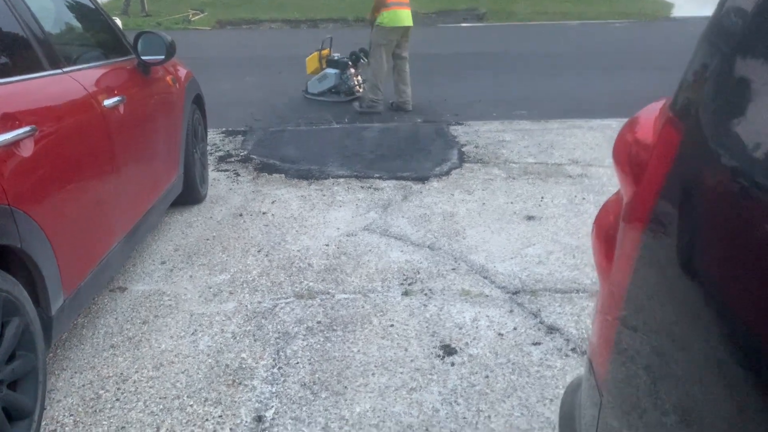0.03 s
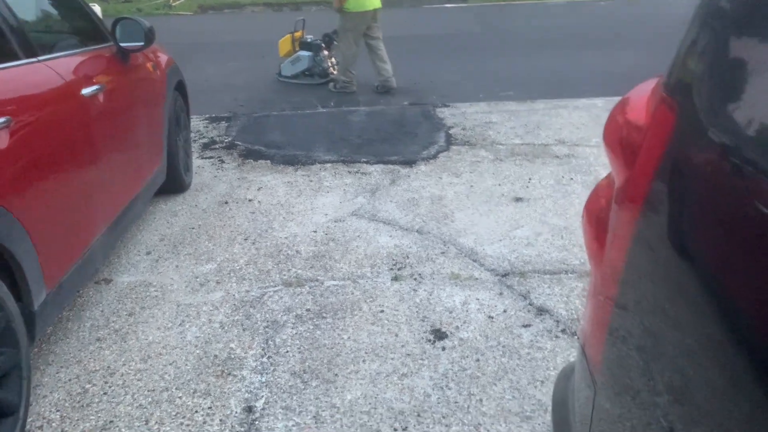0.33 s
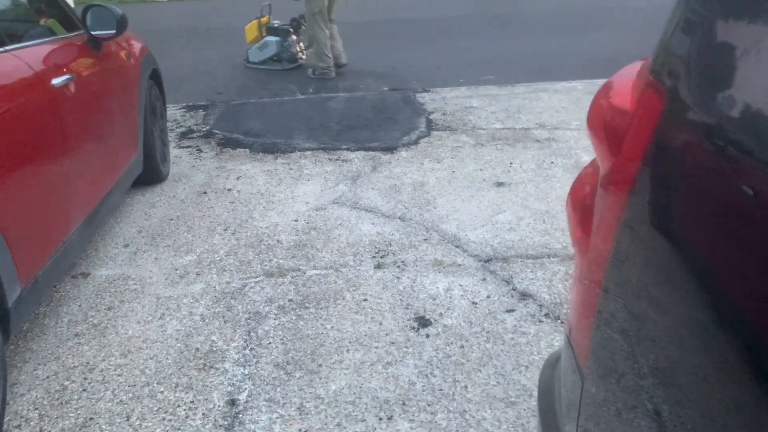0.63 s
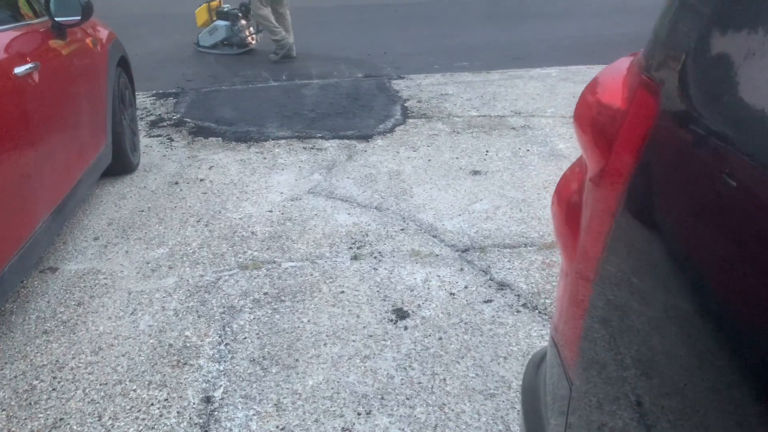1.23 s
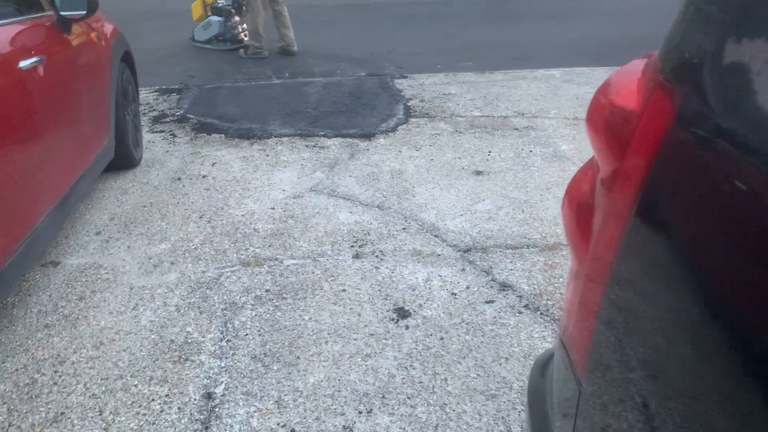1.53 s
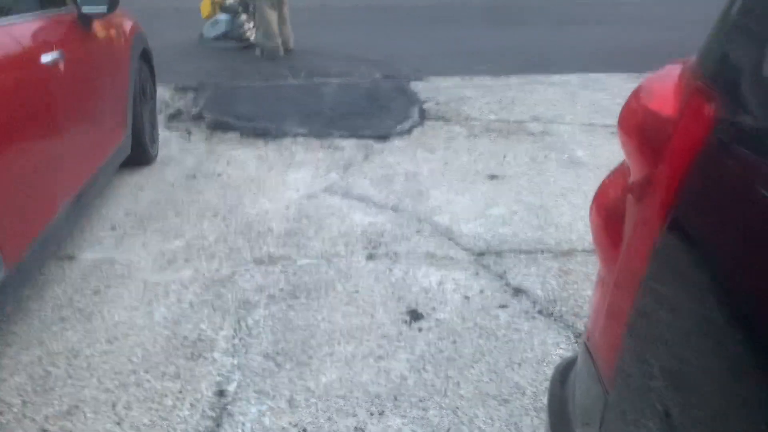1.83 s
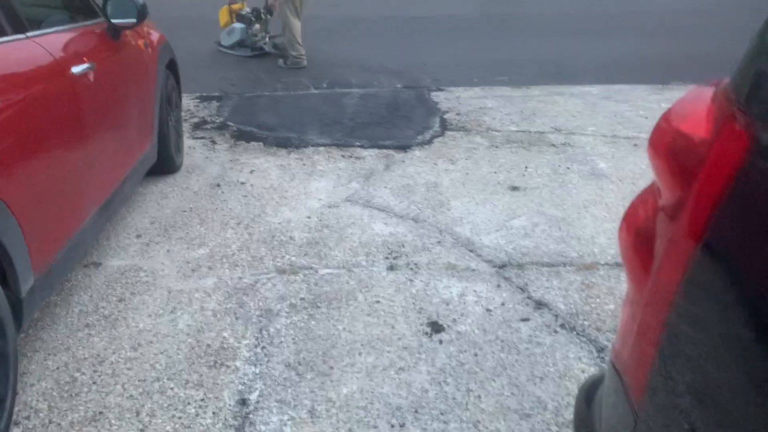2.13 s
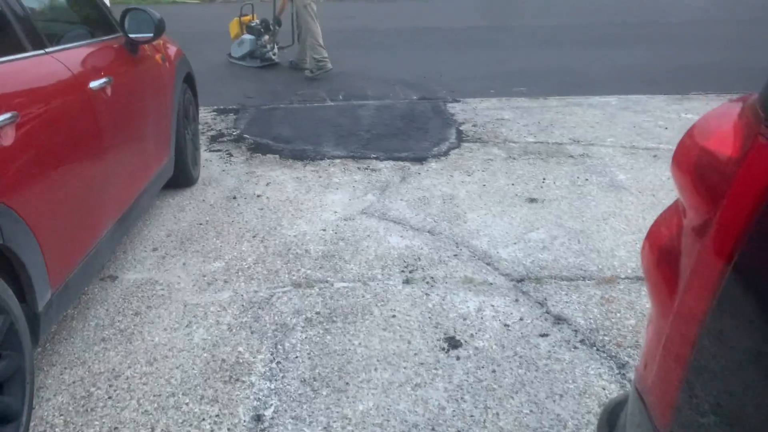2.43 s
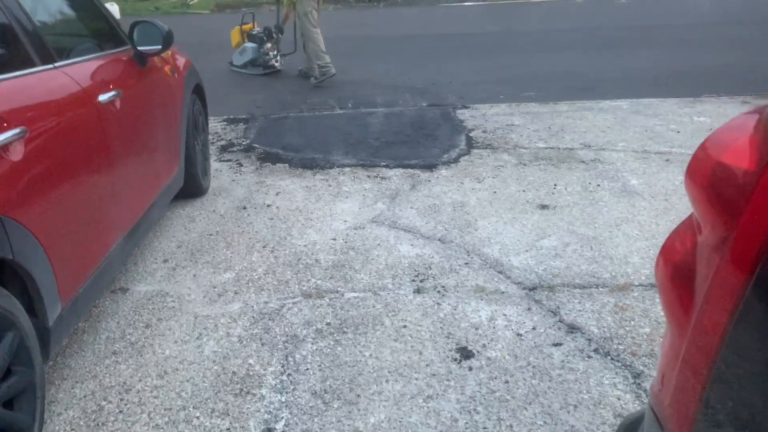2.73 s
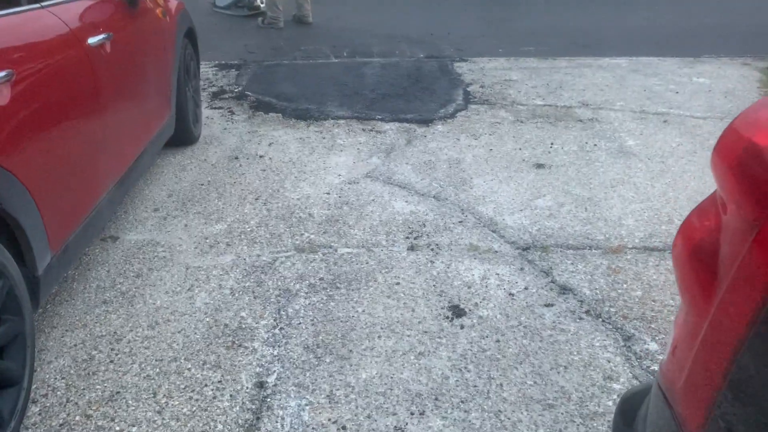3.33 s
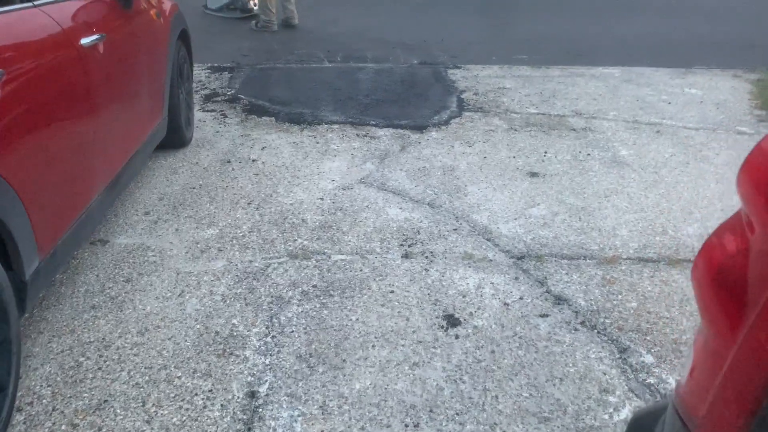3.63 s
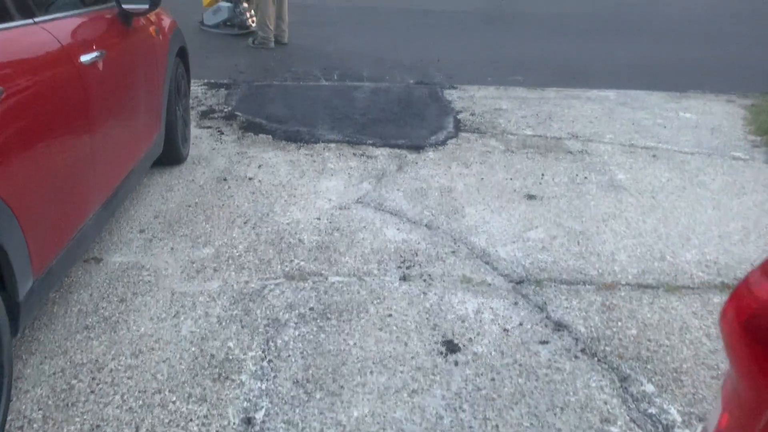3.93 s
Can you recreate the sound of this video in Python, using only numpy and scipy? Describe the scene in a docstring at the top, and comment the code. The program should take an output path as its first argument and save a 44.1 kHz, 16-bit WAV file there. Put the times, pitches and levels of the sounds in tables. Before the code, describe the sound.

Outdoors, a few metres down a driveway, a plate compactor rattles with fast, uneven metallic clanks above its petrol engine. After a brief ringing squeal it throttles down and the hammering dies away, leaving a few small close clicks.

```python
"""A petrol plate compactor works on fresh asphalt a few metres down a driveway, between two parked cars.
Its steel plate hammers the ground in ragged clanks and briefly sings; the engine putters and hisses underneath.
Then the throttle closes, the clanks thin out and stop, and a few small clicks sound near the microphone."""
import sys
import numpy as np
from scipy import signal
from scipy.fft import rfft, irfft
from scipy.io import wavfile

SR = 44100
rng = np.random.default_rng(int(sys.argv[2]) if len(sys.argv) > 2 else 0)


def master_out(mix):
    """Clip the mix to full scale and print it as 16-bit PCM to the path in sys.argv[1]."""
    frames = np.transpose(np.atleast_2d(mix))
    ceiling = np.clip(frames, -1, 1)
    pcm = np.round(ceiling * 32767).astype(np.int16)
    wavfile.write(sys.argv[1], SR, pcm)


N = 176400

# bouts of the plate striking the ground (s, level of the low ring dB, level of the bright crash dB)
CLANKS = [(0.0, -17.5, -26.5), (0.056, -18.5, -18), (0.112, -18, -20), (0.127, -31, -20), (0.145, -17.5, -18.5), (0.213, -19.5, -23),
          (0.289, -16, -14), (0.3, -24, -13.5), (0.398, -35, -28), (0.461, -20, -16.5), (0.488, -21.5, -20.5),
          (0.57, -20.5, -20), (0.645, -19.5, -18.5), (0.675, -24, -21), (0.727, -20.5, -19.5), (0.779, -37, -21.5),
          (0.823, -20.5, -21.5), (0.891, -18, -18), (0.916, -22, -20.5), (0.986, -25.5, -20.5),
          (1.028, -19, -21.5), (1.049, -18.5, -20), (1.073, -21.5, -29), (1.111, -20.5, -20), (1.211, -17, -22),
          (1.289, -17, -20), (1.304, -16.5, -16.5), (1.416, -22, -24), (1.446, -22.5, -23.5), (1.486, -23.5, -21), (1.545, -19.5, -24),
          (1.592, -19, -21.5), (1.669, -19, -23), (1.69, -16.5, -21), (1.778, -28.5, -23.5),
          (1.801, -23.5, -21.5), (1.85, -20.5, -26.5), (1.923, -19.5, -24.5), (1.964, -20, -24), (2.029, -18, -27.5),
          (2.078, -19, -31), (2.123, -19.5, -24), (2.173, -16.5, -19.5), (2.272, -14, -19), (2.287, -31, -24.5), (2.363, -15, -20),
          (2.426, -18.5, -21), (2.447, -20, -22.5), (2.477, -21, -18.5), (2.506, -20, -25.5), (2.54, -14, -25),
          (2.642, -21, -23.5), (2.657, -17, -20), (2.718, -32, -20.5), (2.798, -21.5, -29.5), (2.855, -19, -21),
          (2.931, -22, -23.5), (2.962, -22.5, -22.5), (3.105, -29, -29.5), (3.172, -24, -24), (3.192, -23.5, -20.5),
          (3.316, -39, -28.5), (3.356, -30, -27.5), (3.529, -39, -42)]
RING_DB, CRASH_DB, SPLIT_HZ = -1, -0.5, 1276
# plate modes (Hz, width Hz, lift as it first faces dB, lift once it has turned dB)
MODES_OF_PLATE = [(677.2, 19.3, 17.5, 16), (771.5, 22.5, 16, 22), (909.4, 24.5, -0.5, 16.5), (962, 10, -7, 14), (1090, 63, 12.5, 3.5),
                  (1368, 30, 7.5, 9.5), (1567, 64, 16, 12.5), (1607.6, 16.7, 17, 16), (2173, 112, 10.5, 14.5),
                  (2400, 64, 8.5, 12.5), (3593, 28, 10, -28), (4410, 30, 8.5, 1)]
TURN_S = (0.99, 2.27)  # the machine swings round between these times
STEEL = [(40, -59), (150, -11.5), (300, 0.5), (440, -8), (540, -2.5), (850, 0.5), (1250, -3), (1900, -12), (2700, -8), (3500, -13.5), (4600, -16.5), (6200, -25.5), (15000, -34.5)]  # (Hz, dB)
# steady chatter of the plate between clanks (s, dB)
CHATTER = [(0, -21.5), (.35, -24), (.55, -25), (1.5, -25), (2.2, -25.5), (2.47, -25.5), (2.75, -23.5), (3.05, -30.5), (3.33, -33), (3.62, -55.5), (4, -66)]
# the plate sings as it drags (s, length s, dB)
SQUEALS = [(2.277, 0.079, -13.5), (2.531, 0.0089, -7.5)]
SQUEAL_HZ, SQUEAL_RISE_S, SQUEAL_FALL_S, SQUEAL_WAVER = 766, 0.025, 0.036, 0.0095
# engine (s, exhaust dB, hiss dB)
ENGINE = [(0, -36.5, -33.5), (1.5, -36.5, -33), (2.5, -39.5, -33), (2.62, -42, -40), (3.05, -43, -41.5), (3.67, -46, -43.5), (3.72, -35, -46), (4, -54, -54)]
PLATE_RATIO = 3.25  # fixed
EXHAUST = [(20, -33), (60, -6.5), (95, -2.5), (152, 3.5), (212, 7), (300, -2.5), (420, -13.5), (900, -31), (3000, -59)]  # (Hz, dB)
FIRING_SPREAD_DB, PUFF_S, PUFF_SHARE = 1.5, 0.0081, 0.025
HISS = [(300, -9), (1500, 6), (3800, 2.5), (7500, 0.5), (11000, 0), (13000, -10), (16000, 7)]  # (Hz, dB)
HISS_PULSE, HISS_DECAY = 0.42, 1
# hum of the eccentric shaft (s, dB)
HUM = [(0, -38.5), (1, -41.5), (1.8, -38.5), (2.55, -36.5), (2.8, -49.5), (3.5, -55)]
# rumble of frame and ground (s, dB)
RUMBLE_LEVEL = [(0, -25.5), (1.4, -35.5), (1.85, -32.5), (2.5, -34.5), (2.75, -42.5), (3.3, -36), (3.6, -51.5)]
RUMBLE = [(20, -18), (45, -5.5), (85, -8.5), (160, -4.5), (290, -2.5), (450, -9.5), (700, -3), (1200, -21), (4000, -50)]  # (Hz, dB)
AIR, AIR_DB = [(20, -26), (60, 18.5), (190, 17), (400, -19.5), (2000, 1.5), (3000, -3.5), (6000, -43)], -45.5  # (Hz, dB)
# small sharp clicks (s, dB)
CLICKS = [(1.008, -26), (2.099, -42), (3.708, -35), (3.736, -31), (3.767, -35)]
CLICK_S = .005  # fixed
CLICK = [(500, -17), (3000, -45), (3850, 11), (4700, -27), (5700, 3), (7300, 1.5), (9000, -3), (10500, -3), (13000, -14), (15500, -3)]  # (Hz, dB)
ECHO_DB, ECHO_T60_S, ECHO_DELAY_S = -12.5, 0.28, .005
# the two microphone ports (Hz, radians by which left leads)
PORT_PHASE = [(0, 10.5), (110, -0.9), (310, 3), (430, 7.5), (780, 7.5), (1450, 8.5), (1620, 8), (1950, 9.5),
              (2170, 9), (2750, 10), (3900, 13), (4300, 13), (5350, 23.5), (6050, 27), (7000, 25.5), (11000, 18), (15300, 16.5)]
# (Hz, left minus right dB)
PORT_BALANCE = [(460, 0), (590, -8), (820, -3.5), (930, 3.5), (1350, -3.5), (1550, 4.5), (1850, -23.5), (2150, 5), (2400, -7), (4300, 0), (4700, -9), (5900, -12), (6400, 0)]
CUT_HZ = 15900  # fixed
T = np.arange(N) / SR
# the frame booms at one low resonance (s, dB)
BOOM_LEVEL = [(0, -26), (.31, -29.5), (.5, -42.5), (2.5, -38), (3.05, -60), (3.22, -36), (3.38, -34), (3.55, -45.5)]
BOOM_HZ, BOOM_WIDTH_HZ = 275, 69
BOOM_PHASE = 1.78  # radians by which left leads
# engine speed (s, firings per s)
FIRING = [(0, 30.3), (2.57, 30.25), (2.9, 24), (3.1, 21.5), (3.6, 17), (4, 14.5)]  # fixed
DRIFT_S, DRIFT_TOP_HZ = 5.5e-5, 4460  # as the machine moves, the left port's lead shrinks by this much, below this frequency
RING_ATTACK_S, RING_HOLD_S, RING_RELEASE_S = 0.0046, 0.013, .013
CRASH_HOLD_S, CRASH_RELEASE_S = .007, .009  # fixed
ATTACK_S = None
HOLD_S = None
RELEASE_S = None
STRIKE_SHARE = None
GRIND = None
GRIT_DB, CHATTER_BRIGHT_DB = 2.5, 0  # unevenness of the grinding; its treble is as bright as a clank's
MODE_SPREAD_DB, MODE_DETUNE = 2.5, 0.004  # each blow lands on another spot and favours other modes
# a thin metallic ring on the first clanks (s, dB relative to the plate)
THIN_RING = [(0, 6), (.32, 7), (.45, -32)]
THIN_RING_HZ, THIN_RING_WIDTH_HZ = 2418, 60  # fixed
# brief high squeaks (s, pitch Hz, dB)
SQUEAKS = [(.58, 9340, -35.5), (.794, 9400, -35), (0.994, 9500, -49), (1.12, 7530, -35), (1.234, 7900, -38), (3.645, 7540, -41), (3.675, 7570, -52)]
SQUEAK_S = 0.022


def amp(db):
    """Decibels to gain."""
    return 10 ** (np.asarray(db) / 20)


def unit(x):
    """Scales to an rms of one."""
    return x / np.sqrt(np.mean(x ** 2) + 1e-20)


def curve(points, column=1):
    """A control over time."""
    points = np.array(points)
    return np.interp(T, points[:, 0], points[:, column])


def read(points, hz):
    """A value over log frequency."""
    f, value = np.transpose(points)
    return np.interp(np.log(hz + 1), np.log(f + 1), value)


def add(mix, s, sound):
    """Lays a sound into the mix at a time."""
    part = mix[max(round(s * SR), 0):][:len(sound)]
    part += sound[:len(part)]


def response(gain_at, size=16384):
    """Causal impulse response of a gain over frequency."""
    log_gain = np.log(np.maximum(gain_at(abs(np.fft.fftfreq(size, 1 / SR))), 1e-5))  # fixed
    return np.fft.ifft(np.exp(np.conj(signal.hilbert(log_gain)))).real[:size // 2]


def colour(x, points):
    """Gives a sound a spectrum."""
    return signal.fftconvolve(x, response(lambda hz: amp(read(points, hz))))[:len(x)]


def wander(rate_hz):
    """Slow chance of rms one."""
    return unit(irfft(rfft(rng.standard_normal(N)) * np.exp(-(np.fft.rfftfreq(N, 1 / SR) / rate_hz) ** 2), N))


def plate_gain(hz, turned, luck=np.zeros((len(MODES_OF_PLATE), 2))):
    """The plate's modes standing out of its broad steel colour; luck shifts each mode's strength and pitch."""
    lift = sum(((1 - turned) * amp(first) ** 2 + turned * amp(later) ** 2) * amp(MODE_SPREAD_DB * louder) ** 2
               / (1 + (2 * (hz - f * (1 + MODE_DETUNE * higher)) / width) ** 2)
               for (f, width, first, later), (louder, higher) in zip(MODES_OF_PLATE, luck))
    return amp(read(STEEL, hz)) * np.sqrt(1 + lift)


def plate():
    """Grit rings the plate: steady chatter, and clanks whenever it bounces hard."""
    swing = np.interp(T, TURN_S, (0, 1))
    grit = rng.standard_normal(N) * amp(GRIT_DB * wander(150))  # fixed
    soft = lambda hz: amp(CHATTER_BRIGHT_DB * (1 - low_share(hz)))
    first, later = (unit(signal.fftconvolve(grit, response(lambda hz: plate_gain(hz, k) * soft(hz)))[:N]) for k in (0, 1))
    out = amp(curve(CHATTER)) * ((1 - swing) * first + swing * later)
    for s, ring_db, crash_db in CLANKS:
        add(out, s, clank(s, ring_db, crash_db))
    thin = signal.lfilter(*signal.iirpeak(THIN_RING_HZ, THIN_RING_HZ / THIN_RING_WIDTH_HZ, SR), out)
    return out + amp(curve(THIN_RING)) * thin


def squeals():
    """Dragging holds the strongest mode in a nearly pure tone."""
    out = np.zeros(N)
    tone = np.sqrt(2) * np.sin(2 * np.pi * np.cumsum(SQUEAL_HZ * (1 + SQUEAL_WAVER * wander(90))) / SR) * amp(1.2 * wander(70))  # fixed
    for s, length, db in SQUEALS:
        out += amp(db) * tone * np.clip((T - s) / SQUEAL_RISE_S, 0, 1) * np.exp(-np.maximum(T - s - length, 0) / SQUEAL_FALL_S)
    return out


def engine(cycles):
    """One uneven exhaust pop per firing, and a gritty hiss that pulses with each turn of the crank."""
    strength = amp(FIRING_SPREAD_DB * rng.standard_normal(256)[cycles.astype(int)])  # fixed
    pops = np.diff(np.floor(cycles), prepend=0)
    puffs = PUFF_SHARE * np.exp(-(cycles % 1) / curve(FIRING) / PUFF_S) * rng.standard_normal(N)
    exhaust = unit(colour(strength * (pops + puffs), EXHAUST))
    pulses = (1 + HISS_PULSE * np.exp(-(2 * cycles % 1) / HISS_DECAY)) * amp(2.6 * wander(113) + 1.0 * wander(21))
    hiss = unit(colour(pulses * rng.standard_normal(N), HISS))
    return amp(curve(ENGINE)) * exhaust + amp(curve(ENGINE, column=2)) * hiss


def ground(turns):
    """The shaft's hum and the rumble of the shaken frame."""
    hum = np.sqrt(2) * np.sin(2 * np.pi * turns) * amp(curve(HUM) + 1.0 * wander(27))
    return hum + amp(curve(RUMBLE_LEVEL)) * unit(colour(rng.standard_normal(N) * amp(5.1 * wander(57)), RUMBLE))


def clicks():
    """Short bright ticks."""
    shape = sum(amp(db) * (T >= s) * np.exp(-abs(T - s) / CLICK_S) for s, db in CLICKS)
    return shape * unit(colour(rng.standard_normal(N), CLICK))


def echoes(x):
    """Scattered reflections from cars and house fronts."""
    t = T[:SR // 2]
    tail = rng.standard_normal(len(t)) * (rng.random(len(t)) < .05) * (t > ECHO_DELAY_S) * amp(-60 * t / ECHO_T60_S)
    return amp(ECHO_DB) * signal.fftconvolve(x, tail / np.linalg.norm(tail))[:N]


def ports(x):
    """The sound reaches the two ports with different phase and level, which drift as the machine moves."""
    hz, t, z = signal.stft(x, SR, nperseg=2048, noverlap=1536)  # fixed
    moved = np.clip((t - TURN_S[0]) / (TURN_S[1] - TURN_S[0]), 0, 1)
    drift = 2 * np.pi * DRIFT_S * np.outer(hz * (hz < DRIFT_TOP_HZ), moved)
    lean = amp(read(PORT_BALANCE, hz) / 2)[:, None]
    left = z * lean * np.exp(1j * (read(PORT_PHASE, hz)[:, None] - drift))
    both = np.array([left, z / lean]) / np.sqrt((lean ** 2 + lean ** -2) / 2)
    return signal.istft(both, SR, nperseg=2048, noverlap=1536)[1][:, :N]  # fixed


def boom():
    """A hollow low resonance of the frame, stirred by the shaking."""
    body = response(lambda hz: 1 / (1 + ((hz - BOOM_HZ) / BOOM_WIDTH_HZ) ** 4))
    sound = signal.hilbert(amp(curve(BOOM_LEVEL)) * unit(signal.fftconvolve(rng.standard_normal(N), body)[:N]))
    return np.array([(sound * np.exp(1j * BOOM_PHASE)).real, sound.real])




def low_share(hz):
    """The share of power that belongs to the low ring rather than the bright crash."""
    return 1 / (1 + (hz / SPLIT_HZ) ** 16)  # fixed


def clank(s, ring_db, crash_db):
    """One hard bounce: a short bright crash, and a low ring that swells and lingers."""
    t, turned = T[:SR // 8], np.interp(s, TURN_S, (0, 1))
    luck = rng.standard_normal((len(MODES_OF_PLATE), 2))
    grit = rng.standard_normal(len(t))
    held = lambda hold, release: grit * np.exp(-np.maximum(t - hold, 0) / release)
    ring = signal.fftconvolve(held(RING_HOLD_S, RING_RELEASE_S) * np.minimum(t / RING_ATTACK_S, 1),
                              response(lambda hz: plate_gain(hz, turned, luck) * np.sqrt(low_share(hz)), size=8192))
    crash = signal.fftconvolve(held(CRASH_HOLD_S, CRASH_RELEASE_S),
                               response(lambda hz: plate_gain(hz, turned, luck) * np.sqrt(1 - low_share(hz)), size=8192))
    return amp(ring_db + RING_DB) * ring / np.std(ring[:SR // 30]) + amp(crash_db + CRASH_DB) * crash / np.std(crash[:SR // 100])  # fixed


def squeaks():
    """Brief high chirps of metal rubbing on metal."""
    out, t = np.zeros(N), np.arange(0, SQUEAK_S, 1 / SR)
    waver = 1 + .008 * wander(250)  # fixed
    for s, hz, db in SQUEAKS:
        turns = np.cumsum(hz * waver[round(s * SR):][:len(t)]) / SR
        add(out, s, amp(db) * np.sin(np.pi * t / SQUEAK_S) * np.sin(2 * np.pi * turns))
    return out




def scene():
    """The machine, its reflections and the outdoor air."""
    cycles = np.cumsum(curve(FIRING) * (1 + 0.0027 * wander(5.6))) / SR
    air = amp(AIR_DB) * unit(colour(rng.standard_normal(N), AIR))
    machine = plate() + squeals() + squeaks() + engine(cycles) + ground(PLATE_RATIO * cycles)
    return ports(machine + air + clicks()) + boom() + np.array([echoes(machine), echoes(machine)])


def record(dry):
    """The recorder's band limit."""
    return signal.oaconvolve(dry, signal.firwin(511, CUT_HZ, window=("kaiser", 9), fs=SR)[None], "same")  # fixed


dry = scene()
out = record(dry)
master_out(out)
```